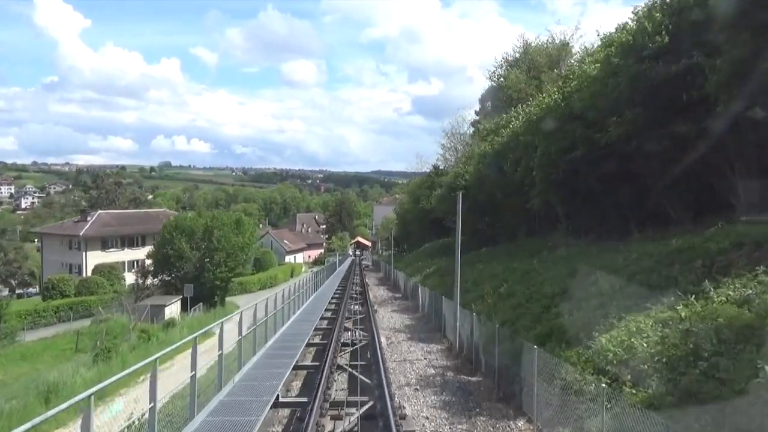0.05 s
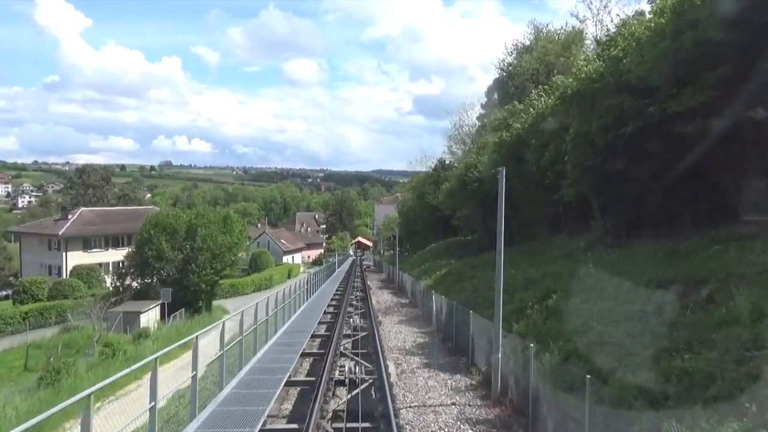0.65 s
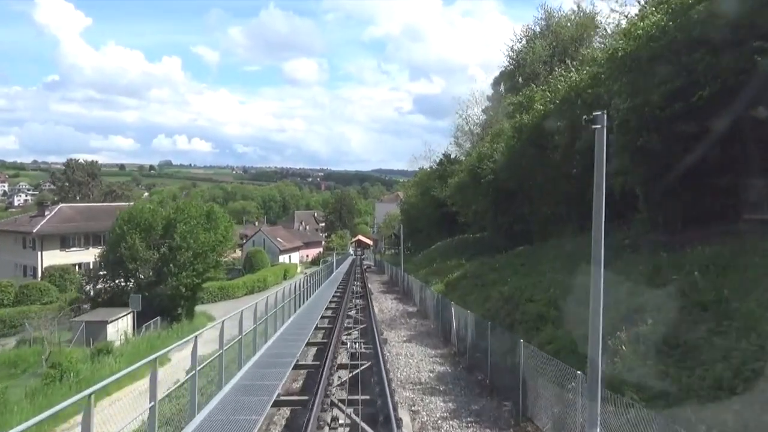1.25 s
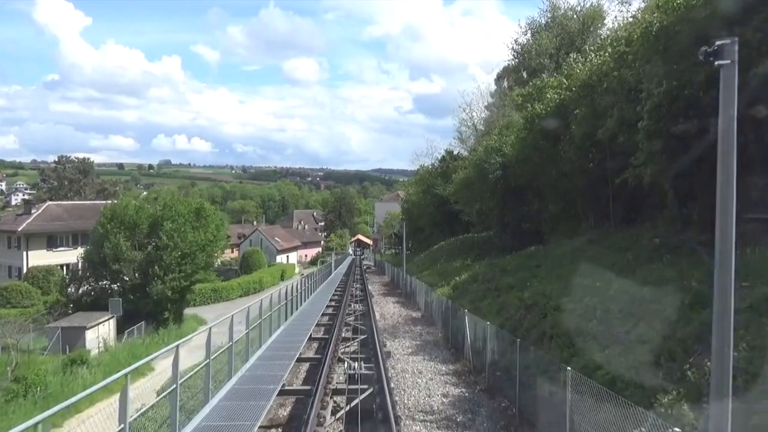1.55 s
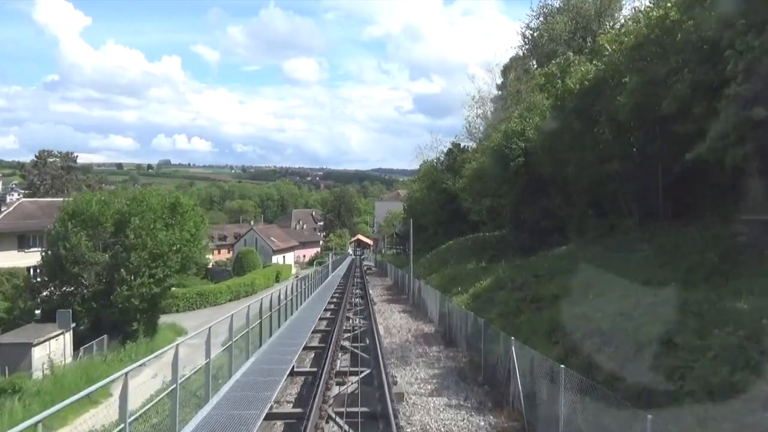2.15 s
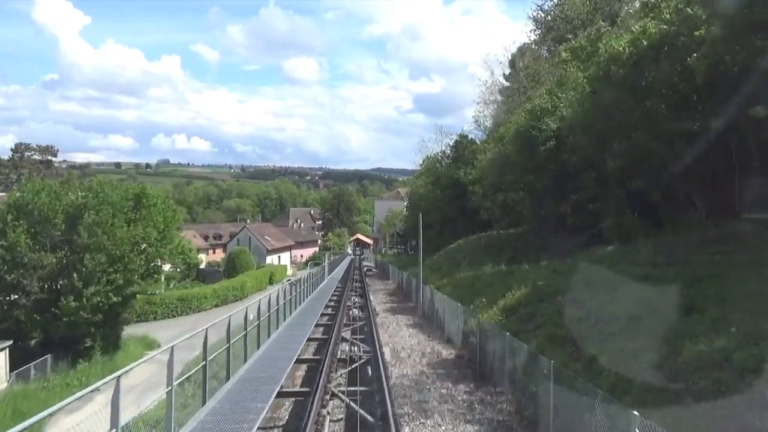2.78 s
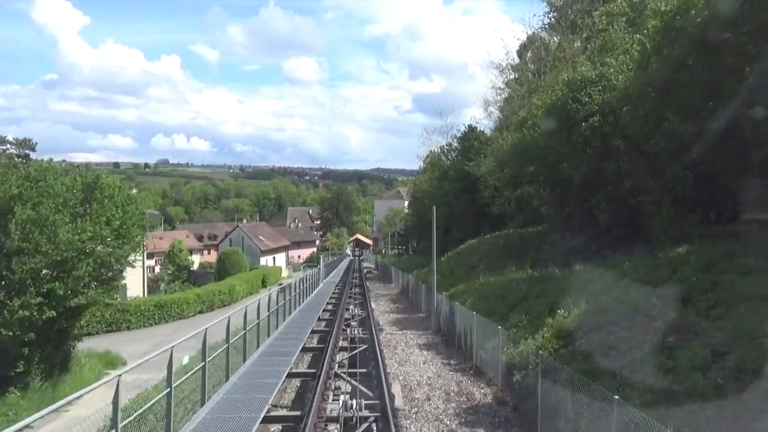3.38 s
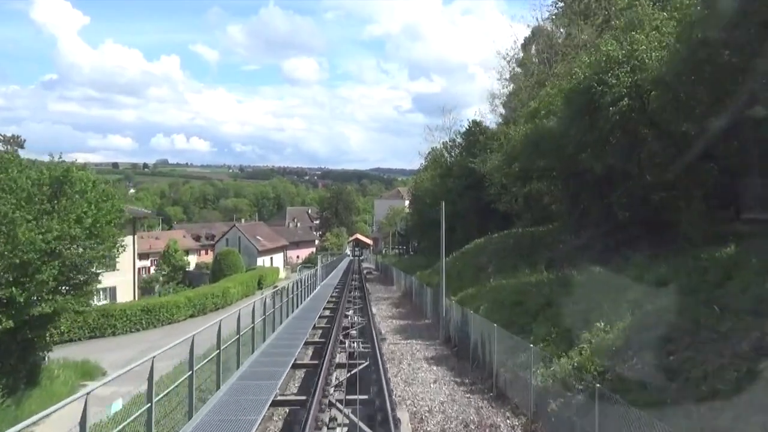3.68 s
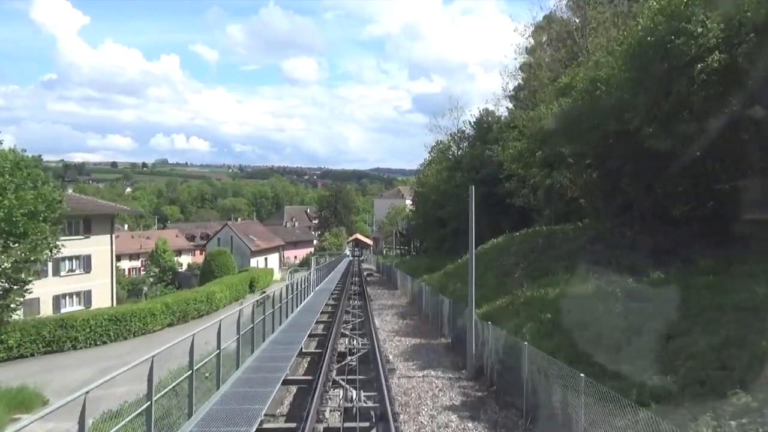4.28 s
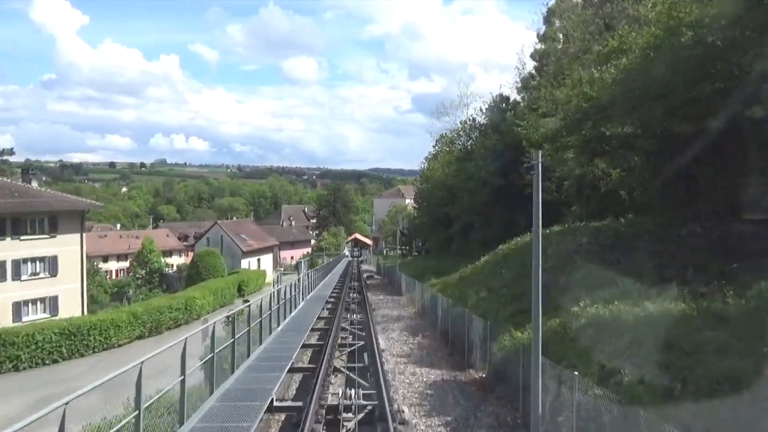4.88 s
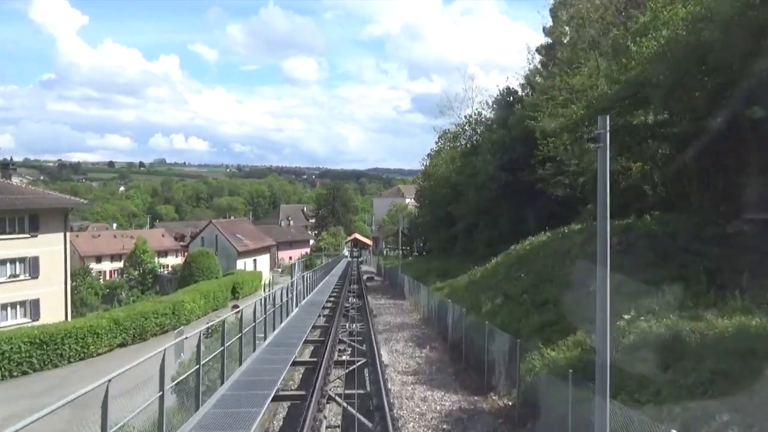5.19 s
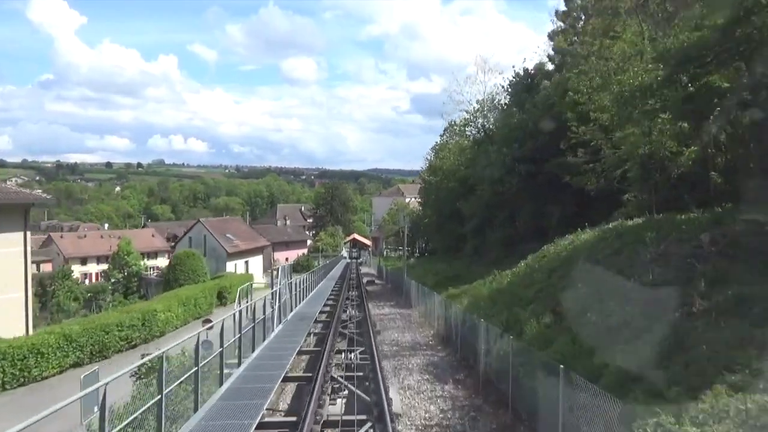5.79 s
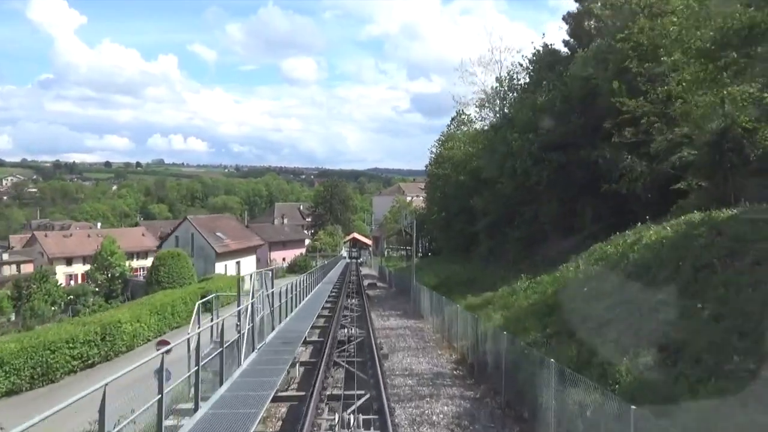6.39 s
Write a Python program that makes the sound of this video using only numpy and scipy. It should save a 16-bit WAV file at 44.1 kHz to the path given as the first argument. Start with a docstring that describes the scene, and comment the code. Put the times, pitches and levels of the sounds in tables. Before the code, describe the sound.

Steady wheel roar and low drone inside a moving funicular car, with hollow bumps and light ticks from a loose fitting.

```python
"""A throbbing roar of wheels fills a funicular car rolling steadily down its track, heard from the front window.
Rough rail sets the wheels, body and panels ringing, and bumps draw hollow notes from them. Underneath, the
frame rocks evenly, the floor booms and the cabin drones on one low note. A loose fitting ticks in short
bursts and the trim cracks, over a thin running hiss with scrapes, faint whines and a rub in each wheel turn."""
import sys
import numpy as np
from scipy import signal
from scipy.fft import rfft, irfft
from scipy.io import wavfile

SR = 44100
rng = np.random.default_rng(int(sys.argv[2]) if len(sys.argv) > 2 else 0)


def store_wav(level_fs):
    """Save 16-bit WAV to argv[1]."""
    pcm = np.round(np.clip(np.atleast_2d(level_fs), -1, 1) * 32767)
    wavfile.write(sys.argv[1], SR, pcm.T.astype(np.int16))


N = 288414
TIME = np.arange(N) / SR
FREQ = np.fft.rfftfreq(N, 1 / SR)

# fader moves for the two wheel notes: time_s, low_db, high_db
WHEEL_LEVELS = [(0, -23.5, -32.5), (.35, -26.5, -36.5), (.7, -26.5, -32.5), (1.6, -25.5, -36.5),
                (2.1, -28, -37.5), (2.55, -25.5, -33), (3, -29, -35), (3.4, -26, -37), (3.85, -25, -30),
                (4.4, -27.5, -35.5), (4.75, -27.5, -33.5), (5.9, -27.5, -35.5), (6.2, -31, -31),
                (6.54, -30.5, -33)]
# resonances behind the low and the high note: pitch_hz, half_width_hz, gain_db
WHEEL_LOW_MODES = [(385, 10, 0.5), (404.7, 12, -2.5)]
WHEEL_HIGH_MODES = [(644, 20.6, -5.5), (664, 29, -14)]
# jolts that make the low note throb: peak_s, boost_db
THROBS = [(.09, 5.5), (.62, 7.5), (.73, 6), (.84, 7.5), (1.02, 5.5), (1.2, 7.5), (1.32, 4), (1.41, 5),
          (1.58, 2), (1.78, 3), (1.93, 7.5), (2.01, 9), (2.38, 4), (3.3, 8.5), (3.62, 2), (3.74, 6),
          (3.84, 10), (3.95, 12), (4.23, 5), (4.39, 9.5), (4.63, 1), (4.9, 5.5), (5.12, 0.5), (5.54, 2),
          (5.83, 7.5), (6.13, -2), (6.42, 4)]

def wheel_ring():
    """The wheels ring on two notes: the low one throbs with each jolt, the high one rocks with the car."""
    low_db, high_db = follow(WHEEL_LEVELS)
    throb_db = sum(db * swell(s, half_length_s=.028) for s, db in THROBS)
    low = surging(WHEEL_LOW_MODES, span_s=.066, surge_db=1.5, rate_hz=25, core=note(hz=389, db=-5.5))
    high = surging(WHEEL_HIGH_MODES, span_s=.17, surge_db=1.7, rate_hz=7.6, core=note(hz=644, db=-10))
    rock_db = rocking(crest_s=2.595, depth_db=1.3)
    return low * gain_of(low_db + throb_db) + high * gain_of(high_db + rock_db)


# fader moves for the shell of the car: time_s, body_db, panel_db
SHELL_LEVELS = [(0, -26, -26), (.9, -23, -24), (1.65, -26, -28.5), (2.1, -23.5, -26.5), (2.55, -24, -28.5),
                (2.9, -25.5, -25.5), (3.7, -24.5, -26.5), (4.2, -28, -24), (4.55, -23, -24.5),
                (5, -26.5, -26.5), (6, -25.5, -25), (6.54, -26.5, -28.5)]
# resonances of the body and of its panels: pitch_hz, half_width_hz, gain_db
BODY_MODES = [(268, 12.6, -0.5), (291.8, 4.4, 1.5), (333, 42, -4.5)]
PANEL_MODES = [(441.3, 24.7, -2.5), (491.3, 11, -1), (506, 7.3, -1.5), (541, 16, -5.5)]
# EQ of the steady rumble under them: frequency_hz, gain_db
RUMBLE_EQ = [(60, -59.5), (180, -20), (245, -1), (380, -2), (460, 3), (590, -2), (700, -6), (850, -29.5),
             (1200, -70.5)]

def car_body():
    """Rough rail shakes the body and its panels, which each hum around one note over a broad rumble."""
    body_db, panel_db = follow(SHELL_LEVELS)
    panel_db += rocking(crest_s=2.92, depth_db=1)
    rumble = noise(gain_of(read(RUMBLE_EQ))) * gain_of(-26)
    body = surging(BODY_MODES, span_s=.2, surge_db=.9, rate_hz=11, core=note(hz=294, db=-9))
    panels = surging(PANEL_MODES, span_s=.18, surge_db=1.3, rate_hz=14, core=note(hz=489, db=-11))
    return rumble + body * gain_of(body_db - 2) + panels * gain_of(panel_db - 1.24)


# EQ of the midrange roar and of the brighter grind: frequency_hz, gain_db
ROAR_EQ = [(450, -42), (680, -4.5), (795, 0.5), (900, -2.5), (1080, -8), (1180, -15), (1500, -30.5),
           (2500, -63.5)]
GRIND_EQ = [(800, -26), (1050, -6.5), (1250, 1), (1700, -5.5), (2200, -10), (2550, -12), (3200, -21),
            (4500, -36), (9000, -71)]
# their fader moves: time_s, level_db
ROAR_LEVEL = [(0, -32.5), (.5, -33), (.62, -32), (.72, -37.5), (.86, -31), (1.15, -32), (1.32, -37),
              (1.48, -32), (1.7, -35.5), (2.05, -34), (2.45, -33.5), (2.8, -32.5), (3.02, -33),
              (3.15, -34.5), (3.3, -32), (3.5, -34), (4, -33.5), (4.5, -33.5), (5.1, -31.5), (5.25, -34.5),
              (5.42, -33.5), (5.65, -30.5), (5.87, -32), (6.3, -31.5), (6.54, -32.5)]
GRIND_LEVEL = [(0, -47), (.4, -45.5), (.68, -47.5), (.92, -44), (1.3, -48), (2.2, -48), (2.8, -46),
               (3.5, -47), (3.95, -47), (4.6, -47.5), (5.07, -46.3), (5.35, -47.5), (5.6, -45), (6.54, -46)]
# the rail singing inside the grind: pitch_hz, half_width_hz, gain_db
RAIL_MODES = [(1507, 57, -10), (2150, 35, -21.5), (2445, 27, -20), (2590, 67, -17), (2867, 46, -21)]
# rough patches of rail that push the grind up: peak_s, boost_db, half_length_s
ROUGH_PATCHES = [(.99, -0.5, .07), (1.473, 2.5, 0.055), (2.93, 3, .04), (3.3, 3, 0.038), (3.6, 1.5, .06),
                 (4.394, 4, 0.047), (5.086, 1, 0.045), (5.553, 0.5, 0.056)]

def rail_roar():
    """Wheels roar and grind on the rail, both fluttering with its roughness, and the rail sings faintly."""
    roar_db, = follow(ROAR_LEVEL)
    grind_db, = follow(GRIND_LEVEL)
    singing = sum(noise(ringing([(hz, width, 0)])) * gain_of(db - 3.5 + 3.45 * wander(rate_hz=15))
                  for hz, width, db in RAIL_MODES)
    patch_db = sum(db * swell(s, half_length) for s, db, half_length in ROUGH_PATCHES)
    rough_db = .8 * wander(rate_hz=61)
    roar = noise(gain_of(read(ROAR_EQ))) * gain_of(roar_db + rough_db)
    grind = (noise(gain_of(read(GRIND_EQ))) + singing) * gain_of(grind_db + patch_db + rough_db)
    return roar + grind


# bumps in the track: peak_s, pitch_hz, level_db, half_length_s
BUMPS = [(0.566, 486, -26, 0.037), (1.12, 488, -22.5, 0.072), (1.273, 278, -25, .045),
         (1.29, 643, -33, 0.089), (1.726, 295.4, -24.5, 0.061), (1.83, 279, -30, .04),
         (2.1, 279.5, -25.5, 0.035), (2.203, 487, -25.5, 0.077), (2.382, 282, -24.5, 0.034),
         (2.53, 33, -33, 0.09), (2.554, 643, -27, 0.045), (2.75, 128.2, -32.5, .05),
         (2.763, 646, -33, 0.041), (2.923, 36.1, -29, 0.056), (3.07, 490, -25.5, 0.087),
         (3.13, 39.6, -26, 0.042), (3.21, 645, -33, .06), (3.29, 43.9, -34, .05), (3.36, 119.6, -33, .06),
         (3.445, 150.5, -27, 0.062), (3.65, 115.3, -33.5, .045), (3.704, 636, -29, 0.061),
         (3.724, 290, -28, 0.038), (3.88, 642, -28.5, .04), (3.996, 288, -27.5, 0.032),
         (4.25, 648, -29.5, 0.06), (4.713, 643, -27.5, 0.051), (4.87, 484.4, -26, .04),
         (5.01, 644, -28.5, 0.056), (5.213, 485.5, -23.5, 0.061), (5.41, 488.5, -23.5, 0.047),
         (5.48, 643, -30, 0.062), (5.72, 648, -29.5, 0.059), (6.465, 643, -29.5, 0.094)]

def bumps():
    """Each bump rings one resonance of the car: a hollow, slightly unsteady note that swells and dies."""
    waver_hz = 3 * wander(rate_hz=19.7)
    out = np.zeros(N)
    for s, hz, db, half_length in BUMPS:
        turns = np.cumsum(hz + waver_hz) / SR + rng.random()
        out += np.sqrt(2) * np.sin(2 * np.pi * turns) * gain_of(db) * swell(s, half_length)
    return out


# fader moves for the low end: time_s, sway_db, boom_db
FRAME_LEVELS = [(0, -43, -33.5), (.9, -39.5, -30.5), (1.7, -38.5, -34.5), (2.05, -43, -33.5),
                (2.3, -42, -30), (2.55, -35.5, -30.5), (3.55, -34.5, -32.5), (3.85, -40, -35.5),
                (4.4, -47, -36.5), (4.65, -35.5, -33), (5, -39.5, -34.5), (5.6, -36.5, -31),
                (6.2, -41.5, -34), (6.54, -42, -31.5)]
# deep resonances of the frame and the floor: pitch_hz, half_width_hz, gain_db
FRAME_MODES = [(34, 13, 0), (56, 20, -6)]
FLOOR_MODES = [(103, 14, -2), (119, 14, -6), (157, 11, -0.5), (181.8, 17.6, 1.5), (222.6, 17, -1.5)]

def frame():
    """Uneven track rocks the frame and makes the floor boom."""
    sway_db, boom_db = follow(FRAME_LEVELS)
    sway_db += rocking(crest_s=2.41, depth_db=2)
    sway = surging(FRAME_MODES, span_s=.4, surge_db=2, rate_hz=9)
    boom = surging(FLOOR_MODES, span_s=.13, surge_db=1.7, rate_hz=7.8)
    return sway * gain_of(sway_db) + boom * gain_of(boom_db + .63)


# fader moves for the drone: time_s, level_db
DRONE_LEVEL = [(0, -28), (.3, -25.5), (.55, -33.5), (.86, -40), (1.02, -32), (1.4, -35.5), (1.9, -40.5),
               (2.7, -38), (3.4, -37.5), (3.65, -37.5), (4.2, -37), (4.55, -34), (4.82, -37), (5.4, -36.5),
               (5.75, -30.5), (5.95, -29), (6.15, -34), (6.3, -35), (6.54, -30.5)]
# its slow drift: time_s, pitch_hz
DRONE_PITCH = [(0, 86.2), (.7, 86), (1.5, 84.24), (3.2, 86.8), (4, 84.5), (6.54, 84.6)]

def drone():
    """One low cabin note swells, fades and wavers, a little right of centre."""
    level_db, = follow(DRONE_LEVEL)
    hz, = follow(DRONE_PITCH)
    tone = np.sqrt(2) * wavering_sine(hz, waver_hz=1.5, rate_hz=11.3)
    motion_db = rocking(crest_s=2.81, depth_db=1.2) + 2.4 * wander(rate_hz=17)
    pan = gain_of([[-.7], [.7]])
    return tone * gain_of(level_db - 1.8 + motion_db) * pan


# colour of the howl: pitch_hz, half_width_hz, gain_db
HOWL_MODES = [(798, 24, -1), (863, 60, -6.5)]
# its cues: peak_s, level_db, half_length_s
HOWLS = [(.2, -34, 0.076), (.44, -34.5, .12), (2.95, -33, 0.074), (5.07, -34.5, 0.092),
         (6.08, -29.5, 0.042), (6.31, -30.5, 0.1)]

def wheel_howl():
    """A higher resonance of the wheels howls now and then."""
    return steadied(noise(ringing(HOWL_MODES)), span_s=.084) * swells(HOWLS)


# bursts of the loose fitting: start_s, tick_count, first_level_db, change_per_tick_db
RATTLES = [(.0423, 1, -47, -2), (.14, 1, -47, 0), (.1855, 1, -45, 0), (.6404, 2, -39.5, -4),
           (.6730, 3, -42, -3), (0.7535, 1, -38, 0), (.78, 1, -41, 0), (.784, 1, -46, 0),
           (0.992, 1, -39.5, 0), (1.2975, 1, -43, 0), (1.4017, 1, -43, -2), (2.4846, 1, -44, 0),
           (2.6758, 1, -45, 0), (2.908, 2, -34.5, -5), (3.1572, 1, -42.5, 0), (3.3722, 2, -46, -1),
           (3.3825, 2, -43, -3), (3.468, 1, -34.5, 0), (3.488, 1, -45, 0), (3.726, 1, -46, 0),
           (3.818, 1, -49, 0), (4.001, 1, -45, 0), (4.363, 1, -45, 0), (4.5915, 1, -44, 0),
           (4.6165, 2, -40, -5), (4.6659, 2, -36, 0.5), (5.1629, 1, -45, 0), (5.222, 1, -46, 0),
           (5.2814, 1, -40, 0)]
# EQ of a tick: frequency_hz, gain_db
TICK_EQ = [(1500, -28.5), (4700, -14.5), (5400, -2.5), (6500, -4.5), (7000, -8.5), (7800, -8.5), (8350, 3),
           (8800, -5.5), (9200, 0), (9550, -8.5), (9900, -4), (10500, -1), (10900, -8), (11300, -8),
           (11800, -24.5), (15000, -42.5)]

def rattle():
    """A loose fitting ticks once per shake of the frame: a bright, dry snap with a faint cabin tail."""
    shake_s, attack_s, snap_t60_s, tail_t60_s = .0248, .0015, .0066, .08
    ticks = [(s + k * shake_s, db + k * step_db)
             for s, count, db, step_db in RATTLES for k in range(round(count))]
    stray_count = 24  # faint single ticks scattered at random
    ticks += zip(rng.uniform(0, TIME[-1], stray_count), rng.normal(-55, 1.5, stray_count))
    power = np.zeros(N)
    for s, db in ticks:
        start = round(s * SR)
        age = np.maximum(TIME[start:][:SR // 8] - s, 0)
        attack = 1 - np.exp(-(age / attack_s) ** 2)
        decay = gain_of(-60 * age / snap_t60_s) + gain_of(-23 - 60 * age / tail_t60_s)
        power[start:][:len(age)] += (gain_of(db + 5.5) * attack * decay) ** 2
    return steadied(noise(gain_of(read(TICK_EQ))), span_s=.002) * np.sqrt(power)


# cracks of the trim: start_s, level_db, tilt_db_per_octave
CRACKS = [(3.95, -48.5, -8), (4.245, -46, -6), (4.345, -47, -7), (5.0195, -41, -16), (5.2225, -47, 0),
          (5.296, -49, 0)]
# EQ of a crack before its tilt: frequency_hz, gain_db
CRACK_EQ = [(1500, -5), (4000, 1), (7000, -3), (9000, -2), (12500, -7), (15000, -13)]

def trim_cracks():
    """The cabin trim gives single cracks, dull or bright, that die within milliseconds."""
    t60_s = .0063
    octaves = np.log2(np.maximum(FREQ, 1500))
    out = np.zeros((2, N))
    for s, db, tilt_db in CRACKS:
        colour = gain_of(read(CRACK_EQ) + tilt_db * octaves) * (FREQ > 1000)
        envelope = (TIME >= s) * gain_of(db - 60 * np.clip((TIME - s) / t60_s, 0, 2))
        out += noise(colour) * envelope
    return out


# EQ of the hiss: frequency_hz, gain_db
HISS_EQ = [(1500, -21.5), (3200, 2), (4500, 2.5), (5600, 0.5), (7000, -2), (7800, -0.5), (8200, 0.5),
           (8800, -3), (9400, -3.5), (10600, -8.5), (11500, -14.5), (12300, -21), (15000, -34.5)]
# its fader moves: time_s, level_db
HISS_LEVEL = [(0, -62.5), (.5, -61), (1, -62.5), (1.5, -64), (2.2, -65), (2.9, -61.5), (3.3, -60.5),
              (3.85, -64), (4.3, -64), (4.9, -62.5), (5.4, -64), (5.7, -61.5), (6.54, -63)]

def hiss():
    """A thin running hiss flickers above the roll."""
    level_db, = follow(HISS_LEVEL)
    flicker_db = wander(rate_hz=18) + wander(rate_hz=230)
    return noise(gain_of(read(HISS_EQ))) * gain_of(level_db - .84 + flicker_db)


# colour of the scraping: pitch_hz, half_width_hz, gain_db
SCRAPE_MODES = [(4100, 990, -10), (5450, 460, -2.5), (6150, 670, -3)]
# its cues: peak_s, level_db, half_length_s
SCRAPES = [(.9, -66, .06), (1.1, -63, .06), (2.97, -66, .05), (3.35, -67, .07), (4.04, -63, .04),
           (4.17, -67, .04), (4.39, -64, .05), (5.57, -66, .06)]

def scrapes():
    """Brief gritty scrapes rise out of a faint, constant scratching."""
    grit = gain_of(1.5 * wander(rate_hz=18) + 2.8 * wander(rate_hz=250))
    envelope = np.hypot(gain_of(-72), swells(SCRAPES))
    return noise(ringing(SCRAPE_MODES)) * grit * envelope


# resonances that the rub sweeps up through: pitch_hz, half_width_hz, gain_db, delay_s
RUB_MODES = [(8070, 130, 0.5, -.075), (8480, 160, -1.5, -.055), (8780, 90, -4, -.035), (9740, 130, -1, 0),
             (10200, 200, -13, .015)]
# strength of the rub and how deeply it pulses: time_s, level_db, depth_db
RUB_LEVEL = [(0, -70, 8.5), (1.8, -70.5, 11), (2.7, -72, 8.5), (3.6, -69, 5), (4.3, -73, 6.5),
             (4.85, -71, 8.5), (5.35, -71.5, 9), (5.9, -69.5, 10.5), (6.54, -69.5, 7)]

def wheel_rub():
    """Metal rubs once in every wheel turn, rising in pitch, never twice alike."""
    turn_hz, crest_s = 4.33, 1.62
    level_db, depth_db = follow(RUB_LEVEL)
    slip_rad = .4 * wander(rate_hz=4)
    rub = 0
    for hz, width, db, delay in RUB_MODES:
        pressure = np.cos(2 * np.pi * turn_hz * (TIME - crest_s - delay) + slip_rad)
        band = noise(ringing([(hz, width, 0)]))
        rub += band * gain_of(db + depth_db * (pressure - .5) + 2.2 * wander(rate_hz=12))
    return evened(rub) * gain_of(level_db)


# colour of the squeal: pitch_hz, half_width_hz, gain_db
SQUEAL_MODES = [(7440, 22, 3.5), (7520, 60, -3), (7700, 120, -6.5), (8850, 150, -6.5)]
# its cues: start_s, length_s, level_db
SQUEALS = [(0.348, .25, -62), (2.195, 0.37, -65.5), (6.111, .35, -65)]

def squeals():
    """Metal on metal holds a thin squeal now and then, sinking back to a faint trace."""
    ramp_s, fade_db, rest_db = .03, -10, -74
    envelope = gain_of(rest_db)
    for s, length, db in SQUEALS:
        age = np.clip(TIME - s, 0, length)
        gate = np.minimum(np.minimum(age, length - age) / ramp_s, 1)
        envelope = np.maximum(envelope, gate * gain_of(db + fade_db * age / length))
    return noise(ringing(SQUEAL_MODES)) * envelope


# colour of the metallic singing: pitch_hz, half_width_hz, gain_db
SING_MODES = [(8100, 35, 0.5), (8330, 150, -4)]
# its fader moves: time_s, level_db
SING_LEVEL = [(0, -74), (.6, -72), (1.2, -80.5), (2.6, -78), (3.1, -71.5), (4.5, -71), (4.9, -76),
              (5.8, -77.5), (6.2, -72), (6.54, -71)]

def metal_singing():
    """Metal sings faintly throughout, high above the roll."""
    level_db, = follow(SING_LEVEL)
    return surging(SING_MODES, span_s=.1, surge_db=-.2, rate_hz=9) * gain_of(level_db)


# whines that never stop: pitch_hz, level_db
WHINES = [(2158, -73.5), (3304, -81.5), (4181, -83), (7436, -84.5), (8763, -81), (10010, -87.5)]
# swells of the whine that comes and goes: peak_s, level_db, half_length_s
WHINE_SWELLS = [(.35, -81, .2), (.8, -79, .15), (1.95, -78, .08), (2.95, -81, .55), (4.95, -80.5, .2),
                (5.55, -79, .22), (6.2, -81, .25)]

def whines():
    """Thin, faint tones waver in pitch and strength; one of them comes and goes."""
    voices = [(hz, gain_of(db)) for hz, db in WHINES]
    voices.append((4618, gain_of(-83) + swells(WHINE_SWELLS)))
    out = np.zeros(N)
    for hz, level in voices:
        tone = wavering_sine(hz, waver_hz=12, rate_hz=55)
        out += level * evened(tone * gain_of(3 * wander(rate_hz=13)))
    return out


# how alike left and right are: frequency_hz, correlation (capped at 1)
STEREO_LIKENESS = [(30, 1.5), (85, 0.87), (150, 0.87), (260, 0.78), (400, 0.84), (500, 0.64), (1000, 0.67),
                   (2500, 0.67), (5500, 0.55), (6500, .99), (15000, 2.5)]
# how far the left side leads: frequency_hz, phase_rad
STEREO_LEAD = [(30, 0.035), (260, 0.02), (1200, -0.55), (3000, -0.56), (6000, 0)]
# balance: frequency_hz, left_minus_right_db
STEREO_BALANCE = [(30, -1.3), (80, -1.5), (130, 1), (300, -0.26), (600, .9), (1500, -0.04), (5000, 0)]

def noise(response):
    """Random vibration with the given amplitude response, spread across the stereo image."""
    left, unrelated = rfft(rng.standard_normal((2, N)))
    likeness = np.clip(read(STEREO_LIKENESS), -1, 1)
    right = likeness * left + np.sqrt(1 - likeness ** 2) * unrelated
    right *= np.exp(-1j * read(STEREO_LEAD)) / gain_of(read(STEREO_BALANCE))
    return evened(irfft(np.array([left, right]) * response, N))


def ringing(modes):
    """Amplitude response of a set of steep-sided resonances."""
    return np.sqrt(sum(gain_of(db) ** 2 / (1 + ((FREQ - hz) / width) ** 2) ** 2
                       for hz, width, db in modes))


def surging(modes, span_s, surge_db, rate_hz, core=0):
    """Resonances around an optional clean core, held even, then made to surge at random."""
    vibration = evened(noise(ringing(modes)) + core)
    return steadied(vibration, span_s) * gain_of(surge_db * wander(rate_hz))


def note(hz, db):
    """A clean ringing note whose pitch and strength waver."""
    tone = wavering_sine(hz, waver_hz=2.986, rate_hz=8.9)
    return gain_of(db) * evened(tone * gain_of(2.5 * wander(rate_hz=3.6)))


def wavering_sine(hz, waver_hz, rate_hz):
    """A sine with a random vibrato."""
    turns = np.cumsum(hz + waver_hz * wander(rate_hz)) / SR
    return np.sin(2 * np.pi * turns)


def rocking(crest_s, depth_db, rock_hz=1.75):
    """A tremolo in dB as the car rocks evenly, as over regular track supports."""
    return depth_db * np.cos(2 * np.pi * rock_hz * (TIME - crest_s))


def swell(peak_s, half_length_s):
    """A bell-shaped rise to 1 and fall around one moment."""
    return np.exp(-np.minimum(((TIME - peak_s) / half_length_s) ** 2, 50))


def swells(cues):
    """The envelope that a cue list of swells adds up to."""
    return sum(gain_of(db) * swell(s, half_length) for s, db, half_length in cues)


def wander(rate_hz):
    """Random drift of rms 1 that moves up to about the given rate."""
    return evened(irfft(rfft(rng.standard_normal(N)) / (1 + (FREQ / rate_hz) ** 2) ** 2, N))


def smoothed_power(x, span_s):
    """Power of the stereo middle, smoothed over the span."""
    return abs(irfft(rfft(x.mean(0) ** 2) * np.exp(-(FREQ * span_s) ** 2), N))


def steadied(x, span_s):
    """Holds the power of a vibration even over the span, as under a constant load."""
    return x / np.sqrt(smoothed_power(x, span_s) + 1e-9)


def evened(x):
    """Scales to rms 1; a stereo pair by the rms of its middle."""
    return x / np.sqrt(np.mean(np.atleast_2d(x).mean(0) ** 2) + 1e-30)


def read(points):
    """A curve over frequency at every bin, joined up on a log axis."""
    hz, value = np.transpose(points)
    return np.interp(np.log(FREQ + 1), np.log(hz + 1), value)


def follow(rows):
    """Each column of an automation table at every sample."""
    s, *columns = np.transpose(rows)
    return [np.interp(TIME, s, column) for column in columns]


def gain_of(db):
    """Decibels to amplitude."""
    return 10 ** (np.asarray(db) / 20)


def scene():
    """The cabin mix: the heavy roll, the ticks and cracks, and a thin top end."""
    roll = wheel_ring() + car_body() + rail_roar() + bumps() + frame() + drone() + wheel_howl()
    clicks = rattle() + trim_cracks()
    top_end = hiss() + scrapes() + wheel_rub() + squeals() + metal_singing() + whines()
    return roll + clicks + top_end


def record(dry):
    """A quick, mild compressor leans on the loudest swells; then soft ends and a low-pass."""
    threshold_db, cutoff_hz = -20, 15350
    level_db = 10 * np.log10(smoothed_power(dry, span_s=.014) + 1e-12)
    over_db = np.logaddexp(level_db - threshold_db, 0)  # a soft knee
    held = dry * gain_of(.53 - .54 * over_db)
    ends = signal.windows.tukey(N, .001)
    low_pass = signal.firwin(511, cutoff_hz, window=("kaiser", 9), fs=SR)
    return signal.oaconvolve(held * ends, low_pass[None], "same")


dry = scene()
out = record(dry)
store_wav(out)
```